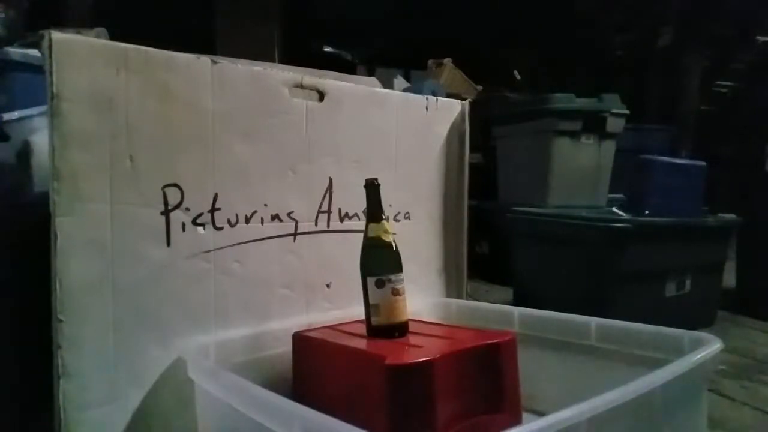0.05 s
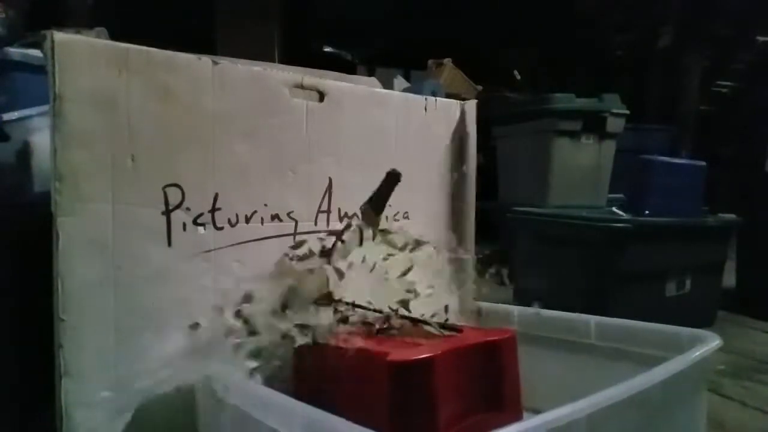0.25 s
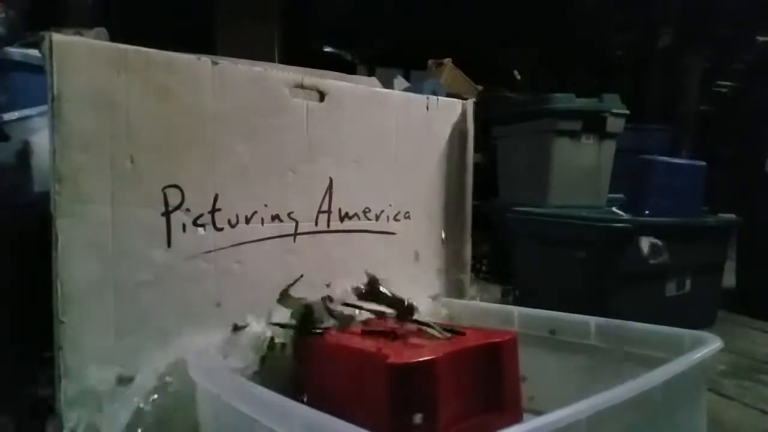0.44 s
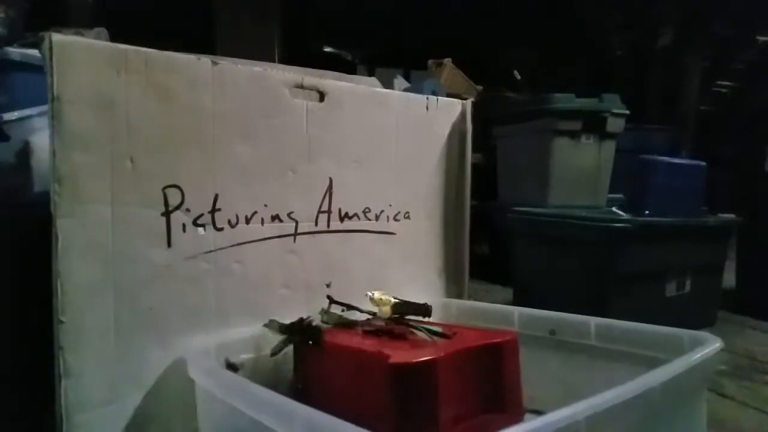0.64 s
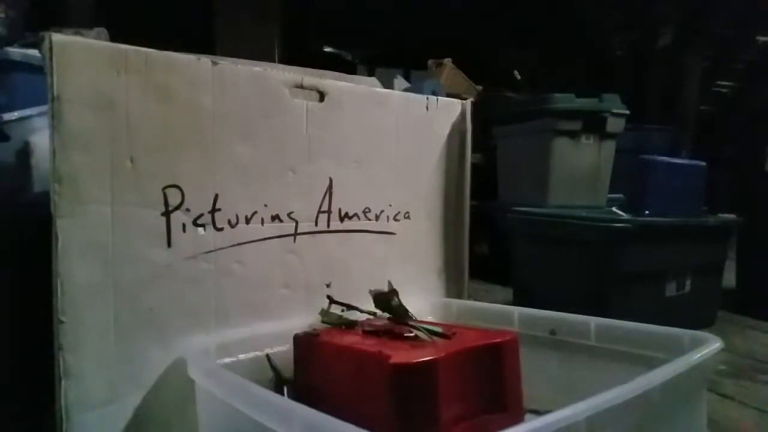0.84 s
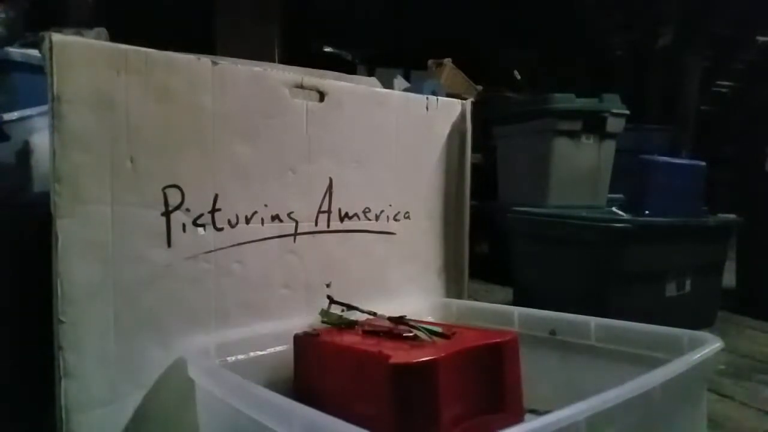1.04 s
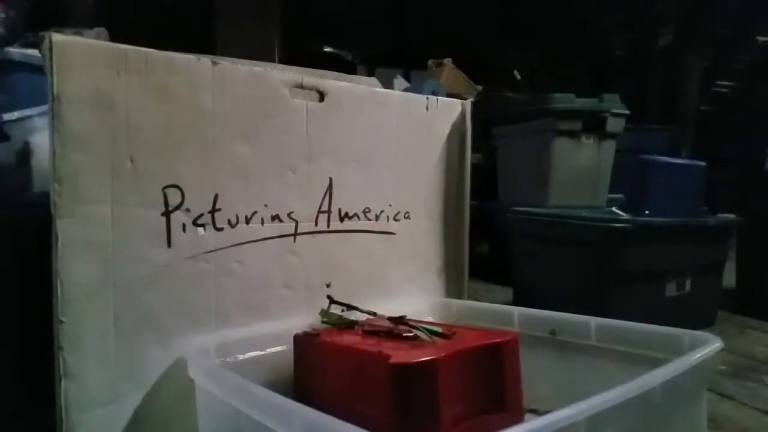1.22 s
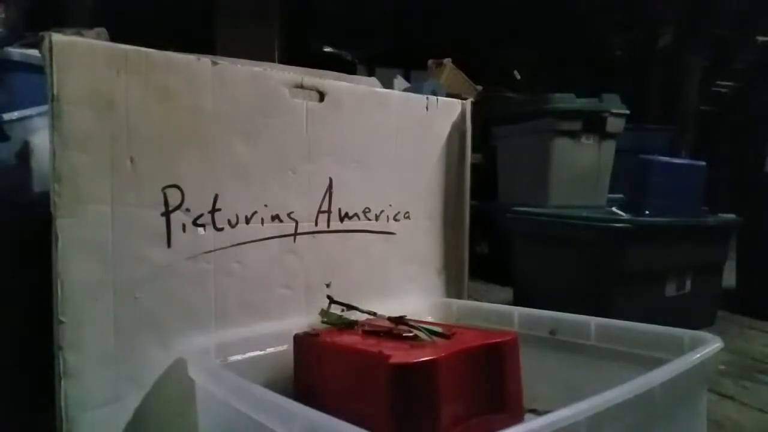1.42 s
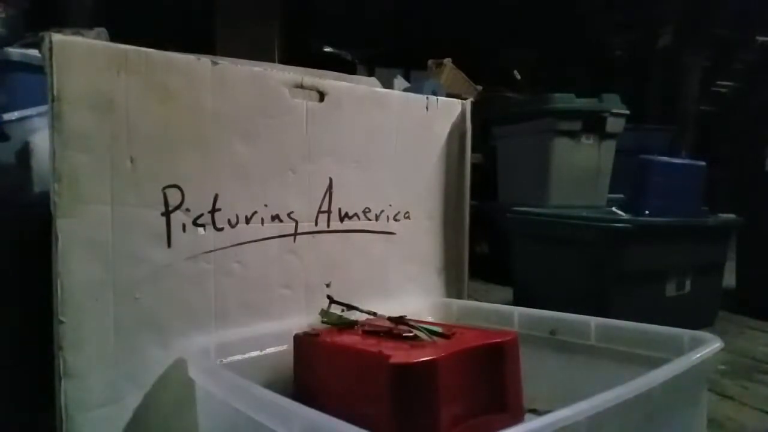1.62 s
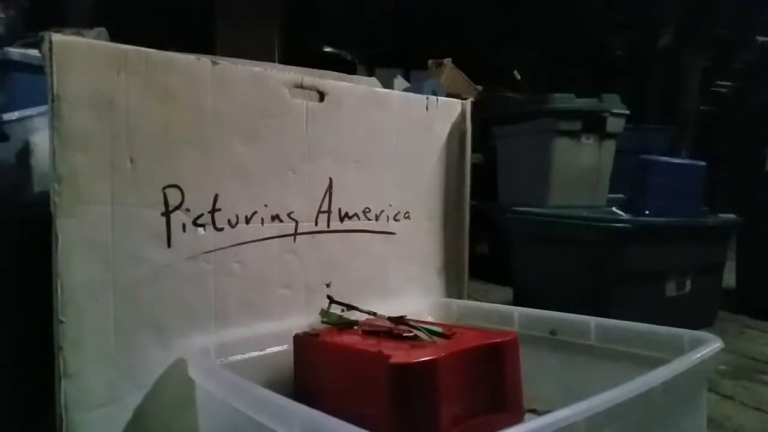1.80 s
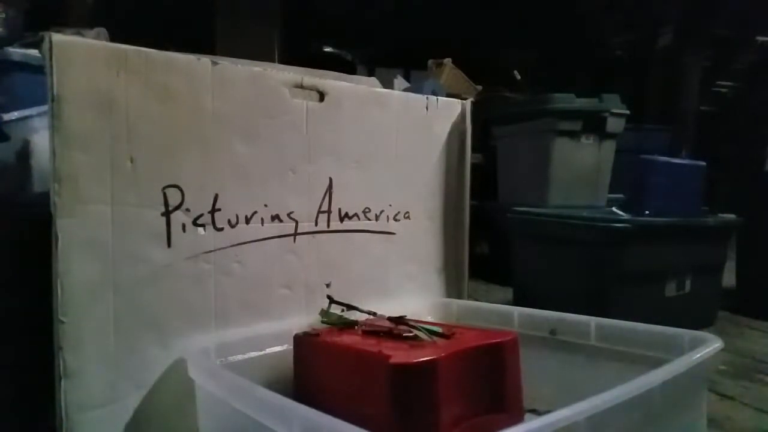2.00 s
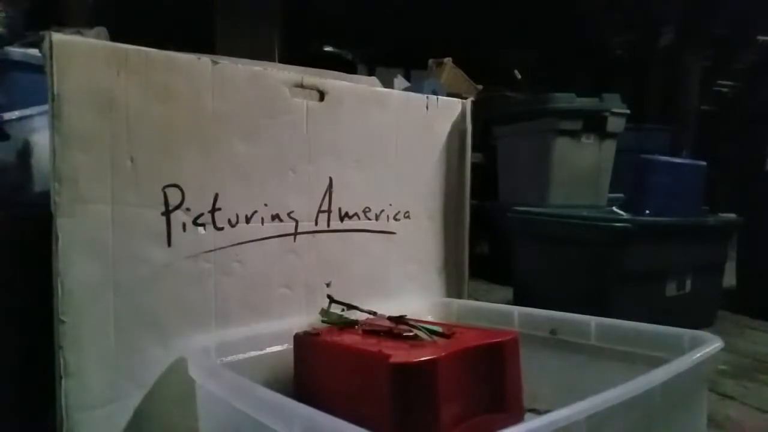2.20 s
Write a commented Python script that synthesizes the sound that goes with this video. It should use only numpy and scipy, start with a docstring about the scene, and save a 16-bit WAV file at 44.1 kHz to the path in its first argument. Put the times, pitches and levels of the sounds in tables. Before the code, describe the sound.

A glass bottle shatters with a sharp crack, spattering liquid as shards tick and chunks clatter hollowly on plastic. The clatter thins to a couple of dull thumps and light dripping on the right, over faint indoor hum.

```python
"""In a quiet storeroom, a full glass bottle cracks on a plastic block in a plastic tub and bursts.
Splinters shower and liquid sprays; large pieces knock about and ring the plastic, while shards
tick and ping against each other. A low hum joins the faint room tone and dull thumps follow.
The spray thins to drips off to the right, and a last piece settles in the tub."""
import sys
import numpy as np
from scipy import signal
from scipy.fft import rfft, irfft, next_fast_len
from scipy.io import wavfile
from scipy.ndimage import uniform_filter1d

SR = 44100
rng = np.random.default_rng(int(sys.argv[2]) if len(sys.argv) > 2 else 0)


def wav_out(sig):
    """Save sig, one row per channel (or a flat mono array), as 16-bit PCM at SR to the path in sys.argv[1]."""
    wavfile.write(sys.argv[1], SR, np.round(np.clip(np.atleast_2d(sig).T, -1, 1) * 32767).astype(np.int16))


N = 103635

# still air: f/Hz, level/dB
AIR_EQ = [(15, -29.5), (25, 1), (33, -34.5), (123, -6.5), (145, -21), (363, -8.5), (489, -11.5),
          (8360, -30), (16000, -32.5)]
# faint hums: f/Hz, level/dB, start/s
HUMS = [(186, -62.5, 1.35), (348, -75, 0)]
# the first crack: f/Hz, level/dB
CRACK_EQ = [(60, -21.5), (300, -4.5), (800, -5), (1400, -7), (1900, -8.5), (2900, -6.5), (4500, -5.5),
            (8000, -11.5), (10000, -19), (15500, -16)]
# the bottle giving way: f/Hz, level/dB
BURST_EQ = [(40, -3.5), (150, -27), (400, 2), (1100, 5), (1600, -1.5), (2300, 0.5), (3600, -5),
            (7500, -10.5), (9500, -16), (11500, -13), (15500, -10.5)]
# modes of the bottle's wall: f/Hz, level/dB, t60/s
BOTTLE_MODES = [(1622, -24, .16), (1884, -10, .075), (2035, -24, .2), (2193, -20, .2), (2461, -22, .16),
                (2761, -11, .06), (3692, -22, .1), (3819, -15, .05), (4490, -26, .12)]
CRACK_S, BURST_S, BLOCK_PAN_DB = 0.2142, 0.2295, -1
# fader ride of the splinter shower: t/s, level/dB
SPLINTER_FADER = [(0.22, -44), (0.24, -19.5), (0.31, -29.5), (0.45, -40.5), (0.51, -34.5), (0.64, -42),
                  (0.83, -54), (0.98, -50), (1.18, -50), (1.31, -44.5), (1.45, -50.5), (1.6, -60),
                  (1.7, -92)]
# splinter sparkle: f/Hz, level/dB
SPLINTER_EQ = [(1500, -8.5), (3000, -8), (7500, 6.5), (9500, -7), (11500, 0), (15500, -1)]
# fader ride of the spray: t/s, level/dB
SPRAY_FADER = [(0.22, -66), (0.27, -21.5), (0.43, -30), (0.56, -29), (0.73, -34.5), (0.84, -41), (1.0, -34),
               (1.2, -38), (1.33, -37), (1.45, -43), (1.6, -40), (1.7, -55), (1.8, -60), (2.34, -67)]
# spray on plastic: f/Hz, level/dB
SPRAY_EQ = [(25, -23.5), (70, -12.5), (200, -12), (450, 5.5), (1100, 0), (2800, -4), (4500, -11.5),
            (7500, -16.5), (9500, -29), (15500, -19)]
# large pieces land on the plastic: t/s, thud/dB, clack/dB, boom/dB
KNOCK_CUES = [(0.249, -7, -16, -21.5), (0.267, -5, -35, -62), (0.3, -6.5, -27.5, -28.5),
              (0.319, -12.5, -19.5, -22), (0.344, -12, -28, -45), (0.373, -25, -27, -36),
              (0.392, -16, -31.5, -31), (0.465, -14, -28, -43), (0.479, -13.5, -30, -25.5),
              (0.491, -14, -22.5, -27), (0.505, -16.5, -25, -36.5), (0.519, -16.5, -24, -41),
              (0.547, -16, -28, -39), (0.577, -18.5, -23, -32), (0.631, -23, -28, -36),
              (0.645, -20, -30.5, -31), (0.661, -23, -32.5, -28.5), (0.699, -46, -36, -47),
              (0.762, -19.5, -29.5, -43), (0.773, -20.5, -39, -34.5), (0.805, -25, -34.5, -39),
              (0.865, -26.5, -36, -45), (0.886, -25, -26.5, -39), (0.894, -18, -25.5, -32),
              (0.924, -21, -44, -44), (0.956, -12.5, -22.5, -50), (0.971, -13, -21.5, -45),
              (0.984, -14, -19.5, -36), (0.998, -16.5, -29.5, -30.5), (1.048, -11.5, -24.5, -34.5),
              (1.064, -17.5, -30, -31), (1.093, -31, -22, -30), (1.099, -11.5, -38, -30),
              (1.115, -19.5, -34.5, -37), (1.139, -25, -59, -51), (1.165, -19, -42, -55),
              (1.23, -23, -32.5, -51), (1.249, -25, -31.5, -46), (1.295, -19, -23, -48),
              (1.305, -19.5, -31, -50), (1.388, -61, -50, -48)]
# a knock's low end: f/Hz, level/dB
BOOM_EQ = [(30, -49.5), (80, -26), (115, -11.5), (150, -15.5), (200, 0.5), (270, -1.5), (360, -9.5),
           (900, -45.5)]
# a knock's body: f/Hz, level/dB
THUD_EQ = [(25, -52.5), (60, -34.5), (110, -23), (200, -18), (310, 0.5), (600, 1), (850, -14.5),
           (1500, -20), (4000, -53.5)]
# a knock's hard edge: f/Hz, level/dB
CLACK_EQ = [(40, -50.5), (200, -28), (600, 1.5), (1100, 2.5), (1600, -4), (2300, -8.5), (3500, -15),
            (6000, -22.5), (15000, -27.5)]
# modes of the plastic: f/Hz, level/dB, t60/s
PLASTIC_MODES = [(202.8, -13, 0.16), (319.2, -4.5, .14), (354, -7.5, 0.1), (431, -7, 0.052),
                 (489.3, -3.5, 0.14), (631.5, -2.5, 0.11), (693, -4, 0.092), (937, -9, 0.21),
                 (1220, -6.5, 0.078)]
KNOCK_ATTACK_S = 0.0019
# glass strikes glass: t/s, level/dB, pan/dB, tilt/(dB per octave)
TICK_CUES = [(0.4037, -14.5, -1, 3.5), (0.5003, -13.5, -0.5, 4.5), (0.5668, -15, 3, -3.5),
             (0.58, -24, -0.5, -1), (0.5954, -23, 7, 12), (0.7094, -23, 1, 2.5), (0.7616, -30, 5, 4),
             (0.8008, -26.5, 4, -8), (0.862, -27, 2, 1), (0.883, -24.5, -6, -3.5),
             (0.9557, -17.5, -4, -1.5), (1.0174, -40, 1, 2), (1.0433, -29, 0, 13), (1.091, -21, -3.0, 7),
             (1.0979, -16.5, -4, 3), (1.1993, -23, -4.0, -1), (1.2482, -15.5, -2.5, 4.5),
             (1.2936, -18, -7, -11), (1.317, -23.5, -9, -5.5), (1.37, -41, -11, -7), (1.408, -29.5, -7, -2),
             (1.5163, -29.5, -14, 0), (1.5799, -53, -1, -2), (1.608, -51, -3, -2)]
# a tick before its tilt: f/Hz, level/dB
TICK_EQ = [(500, -43), (2000, 5), (4000, 0), (7800, 0), (9500, -14), (11500, -9.5), (15500, -3.5)]
# small shards ring: t/s, f/Hz, level/dB
PING_CUES = [(0.495, 8500, -37.5), (0.545, 14600, -32), (0.604, 8480, -44), (0.634, 10700, -55),
             (0.684, 10700, -40.5), (0.738, 14750, -42.5), (0.902, 10160, -30.5), (0.957, 11050, -37),
             (1.058, 4080, -40), (1.278, 11000, -46)]
# dull thumps: t/s, level/dB, t60/s
THUMP_CUES = [(1.479, -23.5, 0.046), (1.517, -23.5, 0.031), (1.616, -42.5, 0.12), (1.649, -44, 0.056),
              (2.206, -56.5, 0.099)]
# a thump's muffled tone: f/Hz, level/dB
THUMP_EQ = [(25, -16), (75, 3), (130, 1.5), (230, -1), (360, 0), (540, 0.5), (850, -10), (1300, -23),
            (4000, -42.5)]
# drips into the tub: t/s, level/dB
DRIP_CUES = [(1.6492, -30.5), (1.6816, -37), (1.721, -33.5), (1.7571, -37), (1.7893, -43), (1.8332, -51.5),
             (1.8481, -45.5), (1.8837, -41), (1.9061, -42), (1.924, -44.5), (1.9926, -54), (2.0055, -44.5),
             (2.0447, -43.5), (2.0702, -39.5), (2.1051, -49.5), (2.177, -47), (2.2079, -44), (2.2715, -34)]
# a drip's splat: f/Hz, level/dB
DRIP_EQ = [(300, -8), (1500, -12), (2800, 0.5), (4200, -6), (5400, -8), (6200, -9.5), (7500, -18.5),
           (9500, -44), (15000, -32)]
# the last piece settling: f/Hz, level/dB
SETTLE_EQ = [(40, -29), (220, -13), (360, 10.5), (470, -1.5), (600, -0.5), (950, -17), (1500, -20),
             (5000, -45)]
# the storeroom's reverb tone: f/Hz, level/dB
ROOM_EQ = [(60, -9.5), (400, -0.5), (1500, -3.5), (5000, -0.5), (9000, -6.5), (15000, -0.5)]
# its decay: f/Hz, t60/s
ROOM_DECAY = [(100, 0.46), (500, 0.29), (1500, 0.47), (4000, 0.41), (14000, 0.32)]
# stereo image: f/Hz, left-right correlation
CORRELATION = [(40, 0.25), (100, 0.93), (350, 0.95), (700, .6), (1500, 0.14), (4000, 0.13), (14000, 0.27)]


def from_db(db):
    """Decibels to gain."""
    return 10 ** (np.asarray(db) / 20)


def rms_one(x):
    """Scale to unit rms."""
    return x / np.sqrt(np.mean(x ** 2) + 1e-20)


def at_hz(points, hz):
    """Read a table on a log-frequency axis."""
    f, v = np.transpose(points)
    return np.interp(np.log(np.maximum(hz, 1)), np.log(f), v)


def fader(rows):
    """Gain along a dB curve, closed before its first point."""
    return from_db(np.interp(np.arange(N) / SR, *np.transpose(rows), left=-200))


def eq(x, points):
    """Minimum-phase EQ of unit power gain."""
    size = 2 * next_fast_len(x.shape[-1])
    gain = rms_one(from_db(at_hz(points, np.arange(size // 2 + 1) * SR / size)))
    cepstrum = irfft(np.log(gain))
    cepstrum[1:size // 2] *= 2
    cepstrum[size // 2 + 1:] = 0
    return irfft(rfft(x, size) * np.exp(rfft(cepstrum)))[..., :x.shape[-1]]


def widen(pair):
    """Two unrelated signals become left and right, narrowest in the bass and low mids."""
    size = pair.shape[-1]
    mid, side = rfft(pair)
    alike = at_hz(CORRELATION, np.arange(len(mid)) * SR / size)
    return irfft(np.sqrt((1 + alike) / 2) * mid + np.sqrt((1 - alike) / 2) * side * [[1], [-1]], size)


def place(x, pan_db, lag_s=.00008):
    """Pan, positive to the left; the left side arrives a little late."""
    left, right = np.broadcast_to(x, (2, x.shape[-1]))
    i = np.arange(len(left))
    left = np.interp(i - round(lag_s * SR), i, left, left=0)
    return np.array([left * from_db(pan_db / 2), right * from_db(-pan_db / 2)])


def add(out, s, x):
    """Mix a sound in at its cue."""
    i = int(s * SR)
    out[:, i:i + x.shape[-1]] += x[..., :N - i]


def ring(clicks, hz, t60):
    """A unit click sets a sine of height 1 ringing."""
    r, w = from_db(-60 / (t60 * SR)), 2 * np.pi * hz / SR
    return signal.lfilter([0, np.sin(w)], [1, -2 * r * np.cos(w), r * r], clicks + 1e-18)


def hit(spectrum, t60, attack_s, size=8192):
    """A crowd of modes struck at once and dying; holds the energy of 10 ms at level 1."""
    t = np.arange(size) / SR
    envelope = from_db(-60 * t / t60) * (1 - np.exp(-t / attack_s))
    bins = rfft(rng.standard_normal((2, size)) * envelope)
    # flatten chance peaks so that the EQ sets the tone
    bins /= np.sqrt(uniform_filter1d(np.abs(bins) ** 2, size=size // 128, axis=-1) + 1e-12)
    gated = irfft(bins) * np.minimum(1, t / attack_s) * (t < t60)
    return rms_one(eq(widen(gated), spectrum)) * np.sqrt(.01 * SR / size)


def snap(spectrum, size=8192):
    """One hard contact; holds the energy of 10 ms at level 1."""
    return eq(1. * (np.arange(size) == 0), spectrum) * np.sqrt(.01 * SR)


def patter(per_s, spread_db):
    """Two streams of random clicks of uneven size."""
    sizes = from_db(spread_db * np.minimum(rng.exponential(1, (2, N)), 4))
    return sizes * rng.choice([-1, 1], (2, N)) * (rng.random((2, N)) < per_s / SR)


def room_tone():
    """A bed of still air and two faint hums; the lower fades in under the clatter."""
    t = np.arange(N) / SR
    hum = sum(from_db(db) * np.sin(2 * np.pi * hz * t) * np.clip((t - s) * 10, 0, 1)
              for hz, db, s in HUMS)
    air = eq(widen(rng.standard_normal((2, N))), AIR_EQ)
    return from_db(-69) * rms_one(air) + hum


def bottle_break():
    """The first crack, then the whole bottle giving way; both ring its wall."""
    out, clicks = np.zeros((2, N)), np.zeros(N)
    for s, db, attack_s, t60, spectrum in ((CRACK_S, -7.5, .002, .032, CRACK_EQ),
                                           (BURST_S, -8, .0005, .24, BURST_EQ)):
        add(out, s, from_db(db) * np.sqrt(t60 / .14) * hit(spectrum, t60, attack_s, size=32768))
    clicks[[int(CRACK_S * SR), int(BURST_S * SR)]] = 1, from_db(-8)
    for hz, db, t60 in BOTTLE_MODES:
        add(out, rng.uniform(0, .002), from_db(db) * ring(clicks, hz, t60))
    return place(out, BLOCK_PAN_DB)


def splinters(count=40, ring_cycles=150):
    """A shower of tiny pieces, each a click with a short ring at one of many pitches."""
    clicks = patter(per_s=1000, spread_db=3)
    voice = rng.integers(0, count, N)
    pitches = np.geomspace(2200, 15500, count) * rng.uniform(.97, 1.03, count)
    rings = sum(ring(clicks * (voice == k), hz, ring_cycles / hz) * np.sqrt(hz)
                for k, hz in enumerate(pitches))
    glass = eq(widen(rms_one(rings) + from_db(-1) * rms_one(clicks)), SPLINTER_EQ)
    return place(rms_one(glass) * fader(SPLINTER_FADER), pan_db=-.3)


def spray():
    """Liquid spatters on the plastic: dense droplets over a soft wash."""
    drops = rms_one(patter(per_s=1500, spread_db=4.5))
    wash = from_db(-8.5) * rng.standard_normal((2, N))
    return place(eq(widen(drops + wash), SPRAY_EQ) * fader(SPRAY_FADER), pan_db=-3.5)


def clink(range_hz=(997.5, 3000), t60=.062, count=3, size=8192):
    """A broken piece rings briefly at a few pitches of its own, its phase differing loosely between left and
    right."""
    t, out = np.arange(size) / SR, 0
    pitches = np.exp(rng.uniform(*np.log(range_hz), count))
    for hz in pitches:
        phase = rng.uniform(0, 2 * np.pi) + rng.normal(0, 1, (2, 1))
        out = out + np.sin(2 * np.pi * hz * t + phase) * np.sqrt(pitches.min() / hz / count)
    return out * from_db(-60 * t / t60) * np.minimum(1, t / .0005)


def knocks(low_cut_hz=183):
    """Each large piece lands with a boom, a thud, a clack and a clink, and rings the plastic."""
    out, rings = np.zeros((2, 2, N))
    for s, thud_db, clack_db, boom_db in KNOCK_CUES:
        add(out, s, from_db(boom_db - .5) * hit(BOOM_EQ, t60=.12, attack_s=.0043))
        add(out, s, from_db(thud_db - 9.5) * hit(THUD_EQ, t60=.075, attack_s=KNOCK_ATTACK_S))
        add(out, s, from_db(clack_db + 1.5) * hit(CLACK_EQ, t60=.075, attack_s=KNOCK_ATTACK_S / 2))
        add(rings, s, from_db(clack_db + 1.5) * clink())
    times, thud_db = np.transpose(KNOCK_CUES)[:2]
    for hz, db, t60 in PLASTIC_MODES:
        strike_db = thud_db + db - 12.5 + rng.normal(0, 3.5, len(times))
        clicks = np.zeros(N)
        clicks[(times * SR).astype(int)] = from_db(strike_db) * rng.choice([-1, 1], len(times))
        rings += ring(clicks, hz, t60)
    rings = signal.sosfilt(signal.butter(4, low_cut_hz, "high", fs=SR, output="sos"), rings)
    return place(out + rings, BLOCK_PAN_DB)


def ticks(pivot_hz=8000):
    """Glass strikes glass: sharp transients, each with its own brightness and pan."""
    out = np.zeros((2, N))
    for s, db, pan_db, tilt_db in TICK_CUES:
        spectrum = [(hz, band_db + tilt_db * np.log2(hz / pivot_hz)) for hz, band_db in TICK_EQ]
        tick = from_db(-2) * snap(spectrum) + hit(spectrum, t60=.018, attack_s=.0002)
        add(out, s, from_db(db - 13.5) * place(tick, pan_db))
    return out


def pings(t60=.095, beat_hz=72):
    """Small shards shimmer with a beating pair of modes."""
    out, click = np.zeros((2, N)), np.arange(SR // 2) == 0
    for s, hz, db in PING_CUES:
        tone = ring(click, hz, t60) + from_db(-4) * ring(click, hz + beat_hz, t60)
        add(out, s, from_db(db) * tone)
    return out


def thumps():
    """Dull, bass-heavy hits with a soft attack."""
    out = np.zeros((2, N))
    for s, db, t60 in THUMP_CUES:
        add(out, s, from_db(db) * hit(THUMP_EQ, t60, attack_s=.0038))
    return place(out, BLOCK_PAN_DB)


def drips():
    """Single drops tap the tub, off to the right."""
    out = np.zeros((2, N))
    for s, db in DRIP_CUES:
        drip = from_db(-3.5) * snap(DRIP_EQ) + hit(DRIP_EQ, t60=.011, attack_s=.0001)
        add(out, s, from_db(db - 16) * place(drip, pan_db=-11.5, lag_s=.00031))
    return out


def settle(at_s=2.1705):
    """A last piece settles in the tub with a soft, hollow knock."""
    out = np.zeros((2, N))
    add(out, at_s, from_db(-39.5) * hit(SETTLE_EQ, t60=.066, attack_s=KNOCK_ATTACK_S))
    return place(out, BLOCK_PAN_DB)


def reverb(x, predelay_s=.0093):
    """The storeroom's walls return a diffuse tail that dies band by band."""
    t, hz = np.arange(SR) / SR, np.arange(SR // 2 + 1)
    noise, tail = rfft(widen(rng.standard_normal((2, SR)))), 0
    for k, (_, t60) in enumerate(ROOM_DECAY):
        band = at_hz([(f, j == k) for j, (f, _) in enumerate(ROOM_DECAY)], hz)
        tail = tail + irfft(noise * band, SR) * from_db(-60 * t / t60)
    tail = eq(rms_one(tail * (t > predelay_s)), ROOM_EQ) / np.sqrt(SR)
    return signal.fftconvolve(x, tail, axes=-1)[:, :N]


def scene():
    """The mix: the smash over room tone, with the dull hits sent harder to the reverb."""
    smash = bottle_break() + knocks() + ticks() + pings() + splinters() + spray() + drips()
    dull = thumps() + settle()
    wet = reverb(smash + from_db(2.5) * dull)
    return smash + dull + from_db(-9.5) * wet + room_tone()


def record(dry):
    """Master: a soft clip rounds the peaks, then a steep high cut at 15.9 kHz."""
    rounded = np.tanh(dry / 1.2) * 1.2
    return signal.sosfilt(signal.ellip(12, .1, 90, 15900, fs=SR, output="sos"), rounded)


dry = scene()
out = record(dry)
wav_out(out)
```